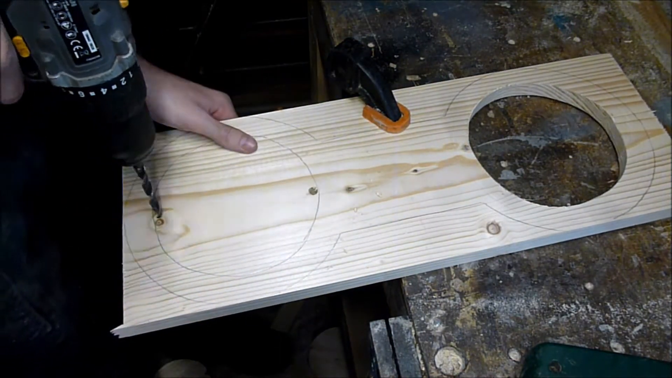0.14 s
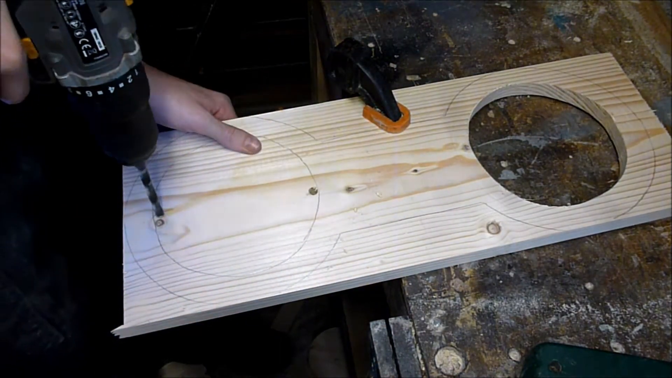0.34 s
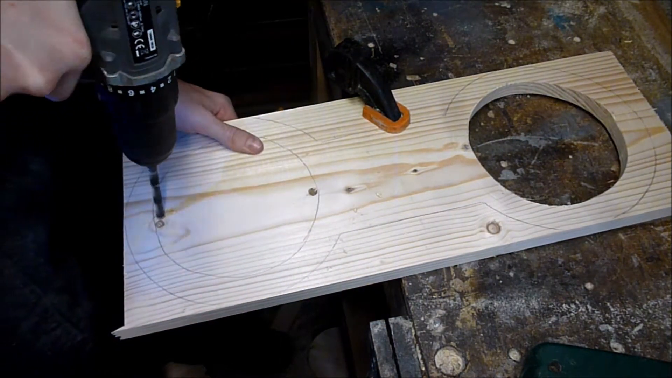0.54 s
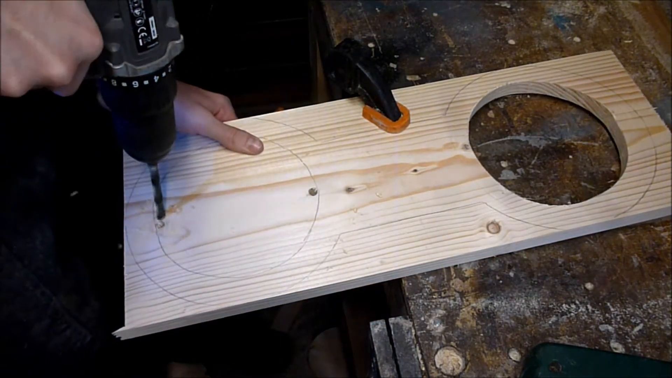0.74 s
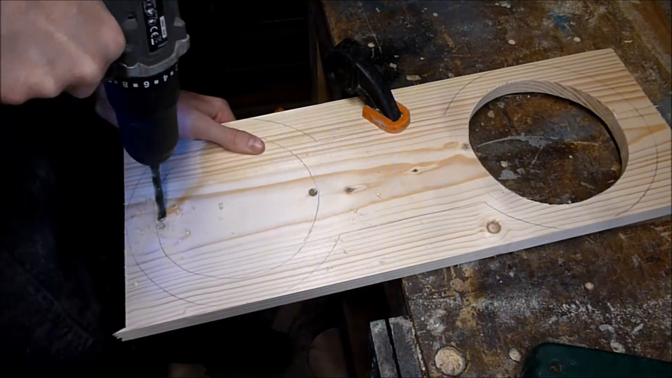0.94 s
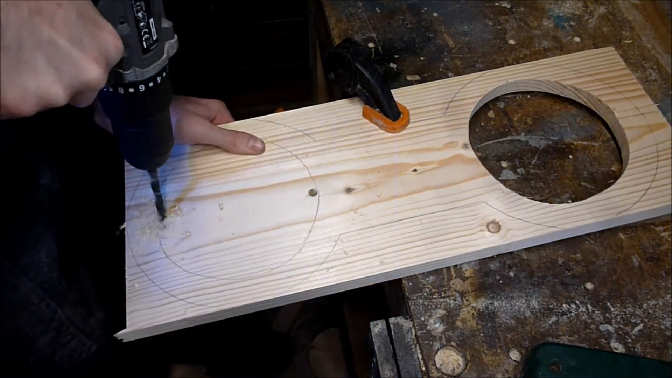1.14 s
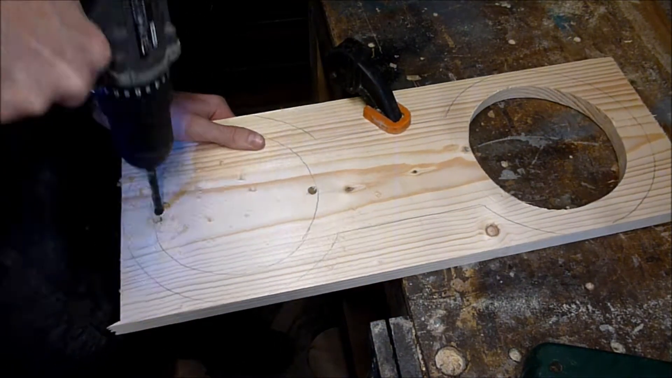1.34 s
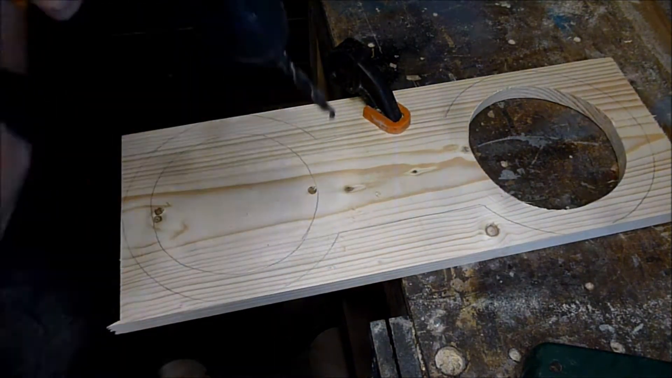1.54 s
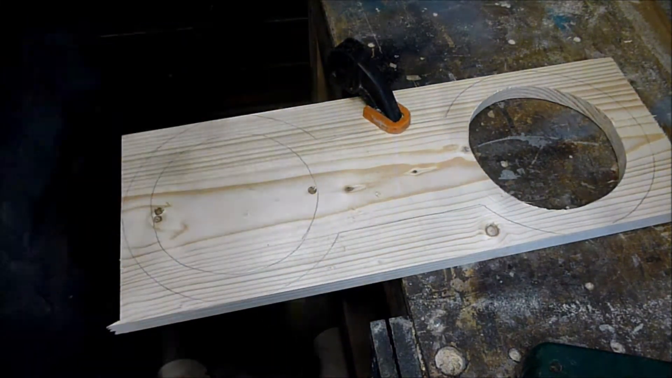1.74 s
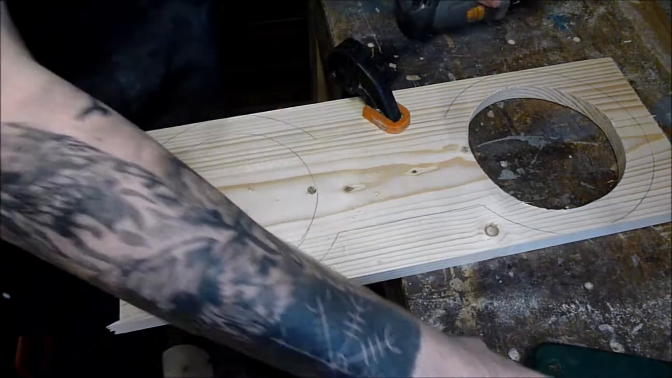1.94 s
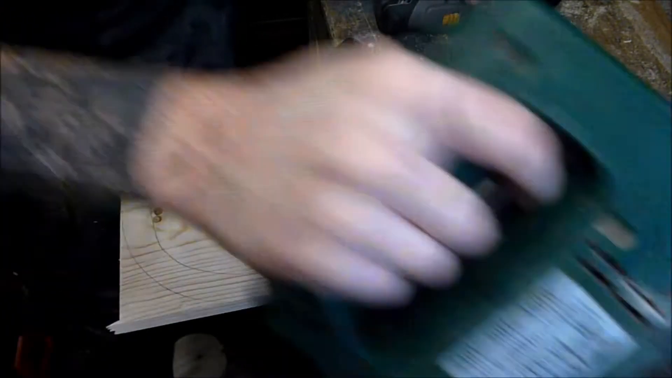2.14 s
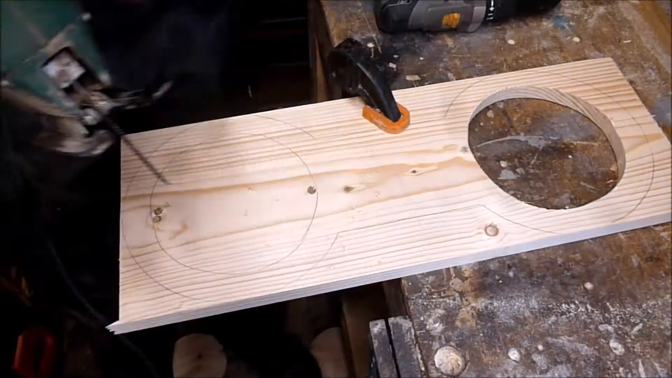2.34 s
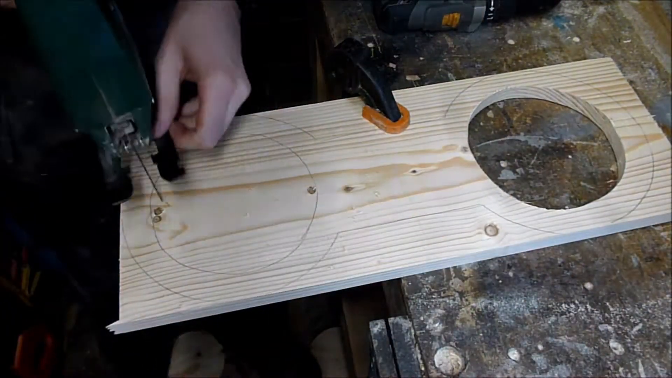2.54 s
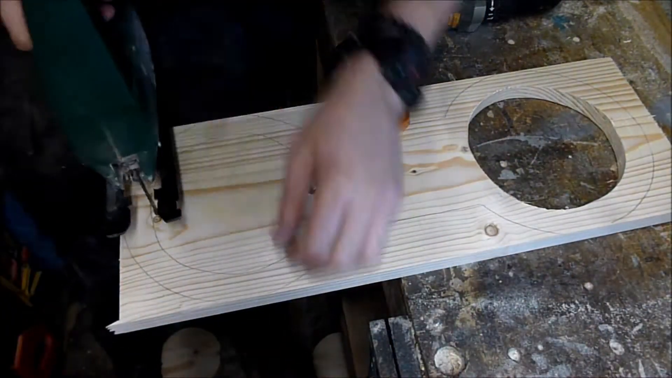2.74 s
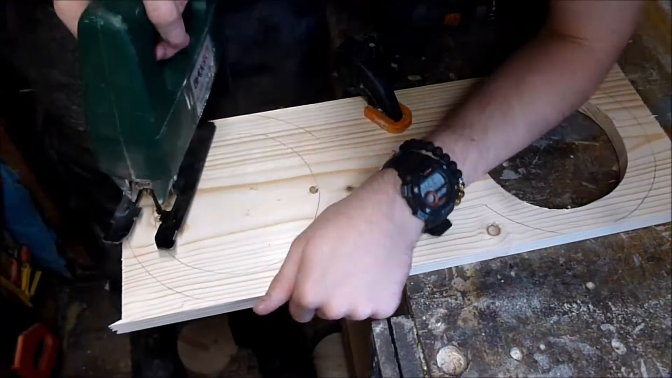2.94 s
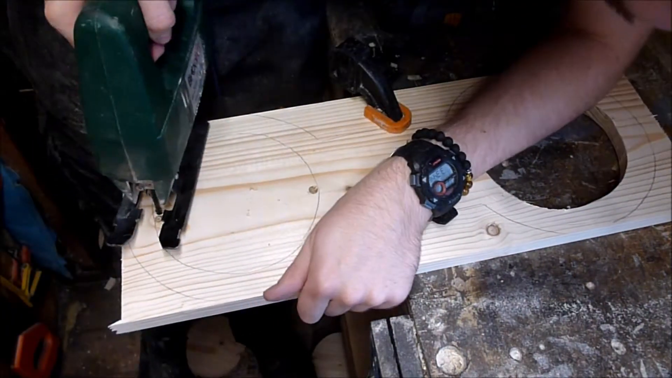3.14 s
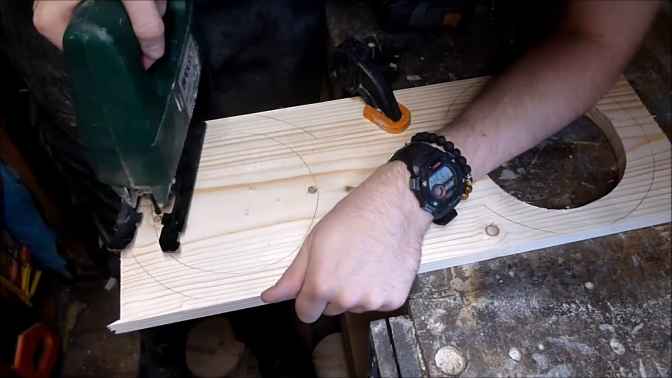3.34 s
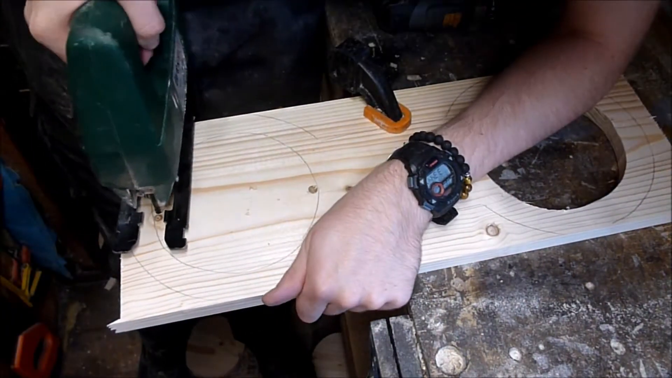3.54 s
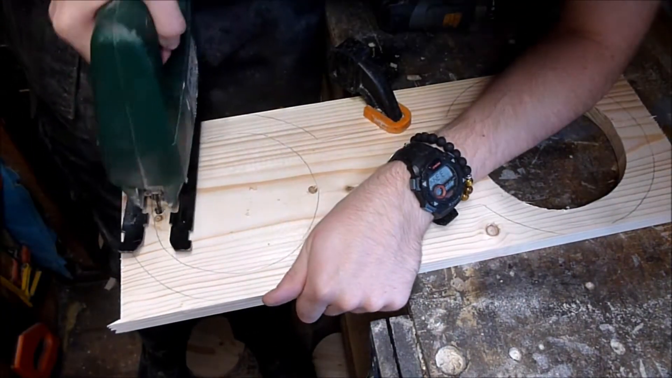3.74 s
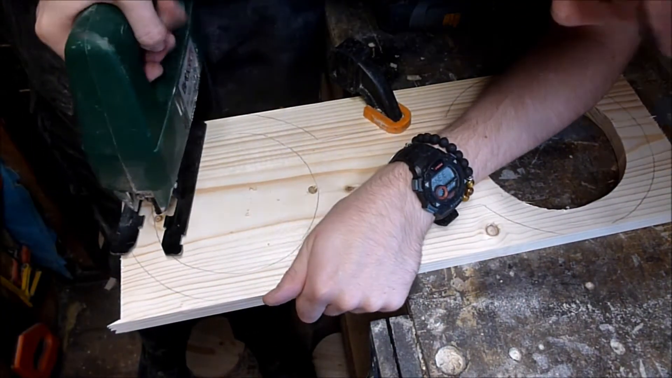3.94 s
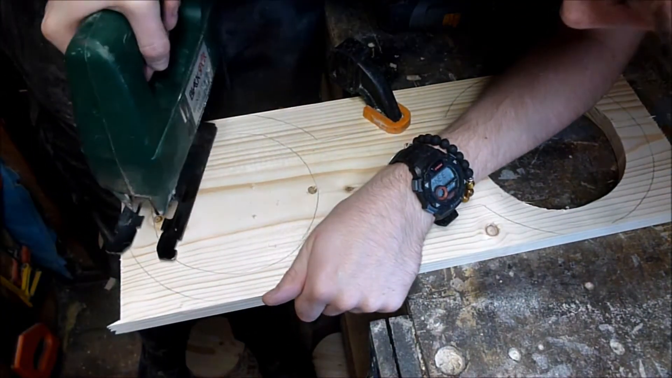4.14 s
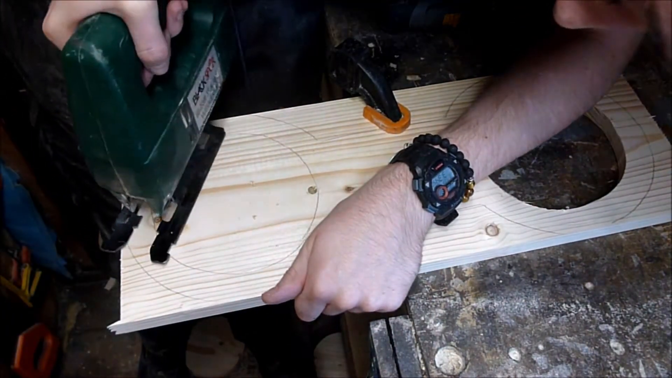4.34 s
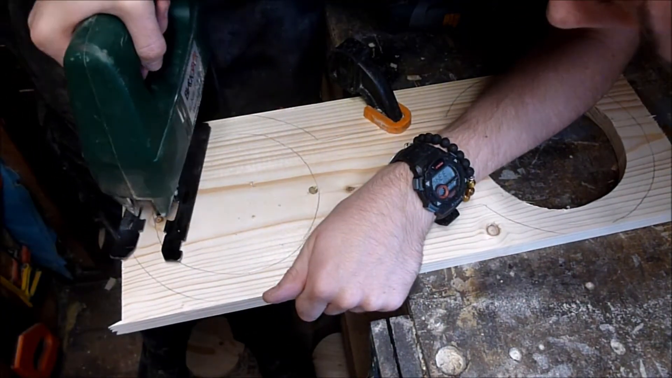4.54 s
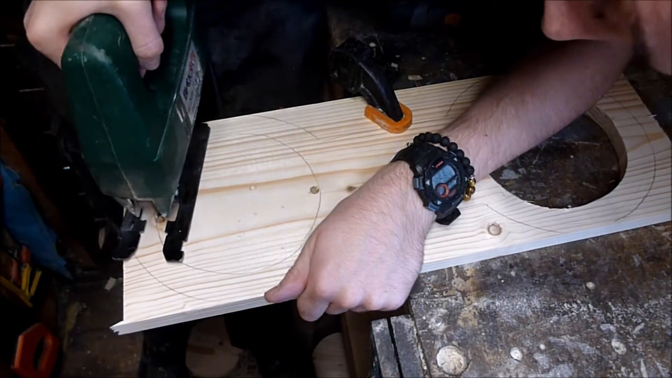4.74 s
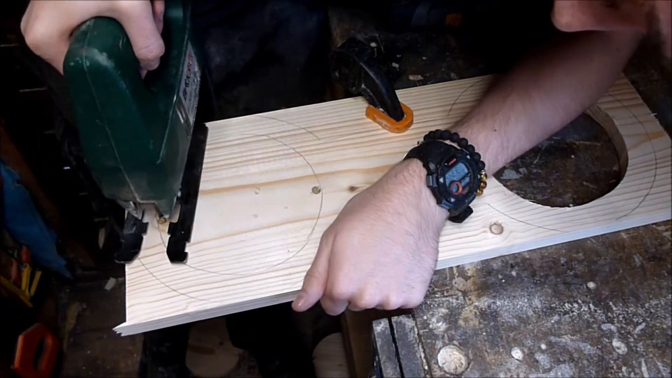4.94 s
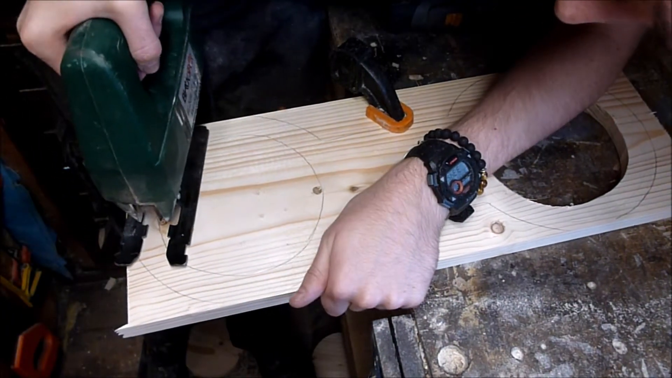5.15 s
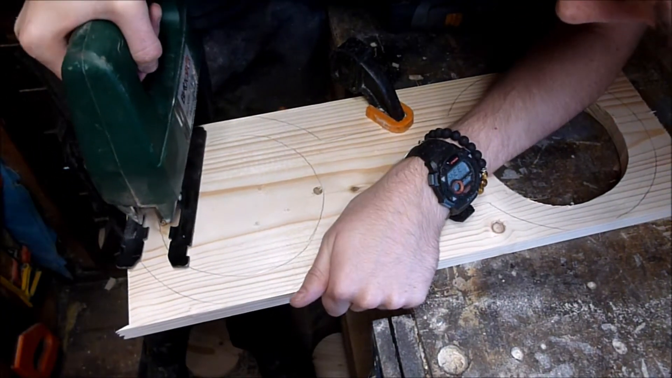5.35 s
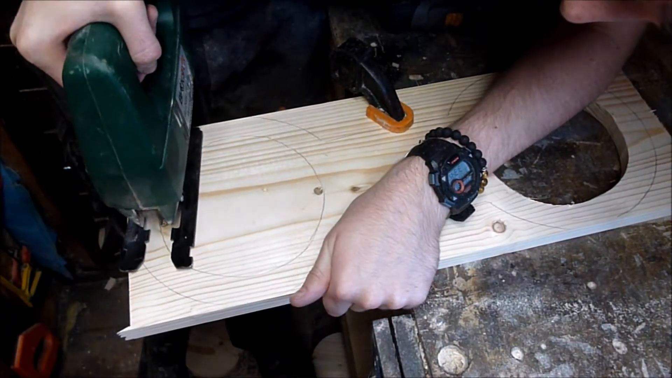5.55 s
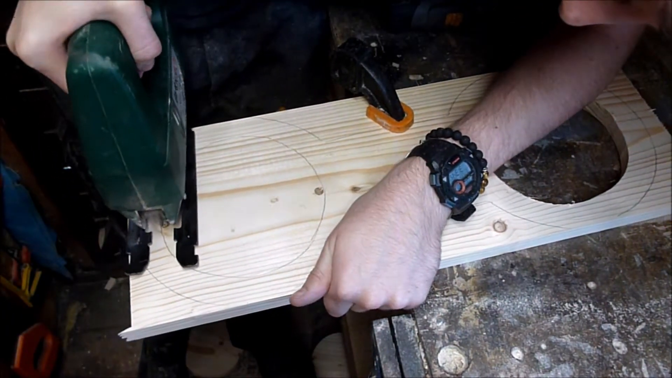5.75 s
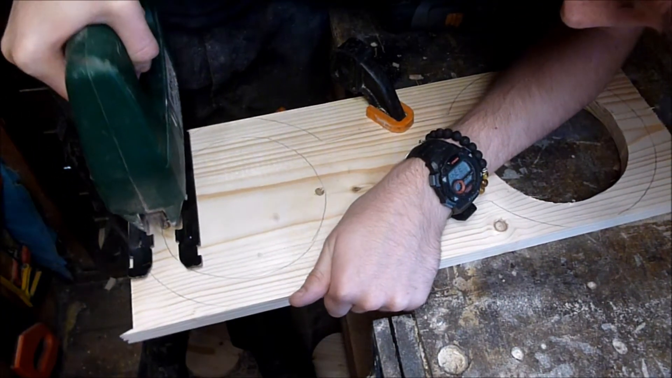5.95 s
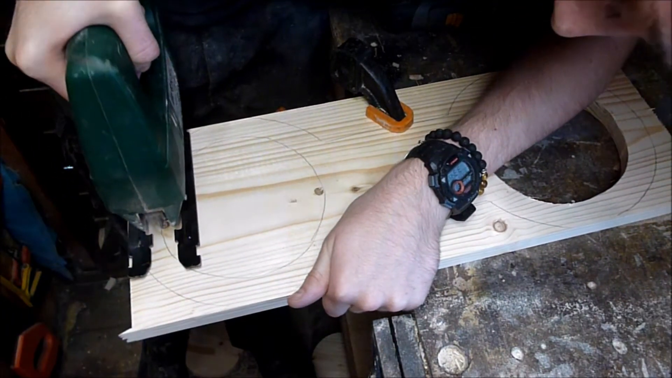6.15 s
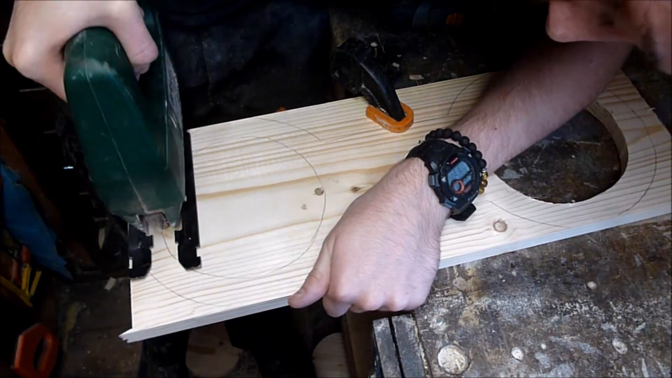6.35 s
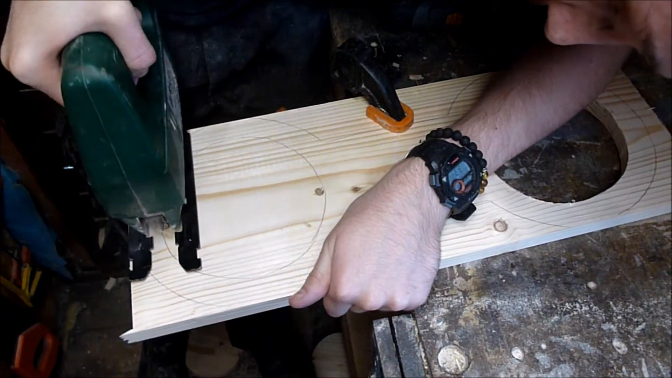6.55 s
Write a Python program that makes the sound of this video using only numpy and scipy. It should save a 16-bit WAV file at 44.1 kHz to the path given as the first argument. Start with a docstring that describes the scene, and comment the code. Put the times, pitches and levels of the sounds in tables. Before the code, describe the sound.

A cordless drill blips, then runs for about a second, hissing and rattling until the bit breaks through a board. Wooden clunks and short scrapes follow as tools are swapped on a workbench, then softer handling knocks. A jigsaw starts with a clack, rises in pitch and begins cutting, labouring with bursts of hammering near the end. Everything is heard from nearby in a small workshop with a faint background hush.

```python
"""A cordless drill whirs and rattles through a pine board clamped to a bench: fan and brush hiss, gear rattle
and thin whistles. Tools are put down and picked up, their knocks and scrapes ringing board and bench. Then a
jigsaw spins up and cuts, its shaft making tones, a rasp and one blade knock a turn, until the blade binds and
hammers. The bench and clamped board ring along with the motors. Under it all lies a room hush whose level sinks
while the motors run and slowly swells back."""
import sys
import numpy as np
from scipy import signal
from scipy.io import wavfile
from scipy.ndimage import uniform_filter1d

SR = 44100
rng = np.random.default_rng(int(sys.argv[2]) if len(sys.argv) > 2 else 0)


def wav_out(sig):
    """Save sig, one row per channel (or a flat mono array), as 16-bit PCM at SR to the path in sys.argv[1]."""
    wavfile.write(sys.argv[1], SR, np.round(np.clip(np.atleast_2d(sig).T, -1, 1) * 32767).astype(np.int16))


N = 290178

# Modes of the pine board and of the bench. Each row: pitch in Hz, relative level in dB, t60 in seconds.
BOARD_MODES = [(693, 1.5, 0.069), (941, -3.5, 0.1), (1245, 8, 0.038), (1426, 19, 0.013), (1578, 7, 0.023)]
BENCH_MODES = [(264, -3, 0.19), (326, 9.5, 0.046), (550, 11.5, 0.011)]
# Bright spectrum of a hard contact. Each row: frequency in Hz, relative density in dB.
CRACK_SPECTRUM = [(1060, -58), (1800, -12.5), (2520, -7.5), (3350, -9), (6710, -14.5), (16000, -28)]
# Pulls of the drill's trigger. Each row: start and length in seconds, hiss and gear rattle in dB.
TRIGGER_PULLS = [(0.106, 0.063, -33, -41.5), (0.227, 1.215, -32, -39)]
# The speed the jigsaw's shaft heads for. Each row: time in seconds, speed in Hz.
SAW_TARGET_SPEED = [(4.088, 100.3), (4.43, 118.1), (4.501, 119.2), (4.545, 132.7), (4.701, 140.2),
                    (5, 145.3), (5.15, 142.1), (5.45, 139.2), (5.67, 136), (5.78, 126.1), (5.85, 121.6),
                    (5.98, 114.9), (6.041, 116.7), (6.331, 117.7), (6.45, 121.2), (6.58, 120.8)]
BITE_S = 4.96  # the blade sinks into the wood


def gain_of(db):
    """Decibels to a factor."""
    return 10 ** (np.asarray(db) / 20)


def unit_rms(x):
    """Scales to rms 1."""
    return x / np.sqrt(np.mean(x ** 2) + 1e-20)


def curves(rows):
    """Turns breakpoints into sample times and one curve for each further column."""
    times, *columns = np.transpose(rows)
    t = np.arange(times[0], times[-1], 1 / SR)
    return [t] + [np.interp(t, times, column) for column in columns]


def add(mix, start, sound):
    """Mixes a sound in at a time in seconds."""
    part = mix[round(start * SR):][:len(sound)]
    part += sound[:len(part)]


def gate(t, start, length, edge):
    """1 from the start for a length, 0 outside, with soft edges."""
    return np.clip(np.minimum(t - start, start + length - t) / edge + .5, 0, 1)


def wander(size, per_s):
    """A random drift of rms about 1, with per_s turning points a second."""
    knots = rng.standard_normal(int(size / SR * per_s) + 2)
    return np.interp(np.arange(size) * per_s / SR, np.arange(len(knots)), knots)


def grit(size, spike_db):
    """Noise whose grains vary in strength."""
    return rng.standard_normal(size) * gain_of(spike_db * wander(size, 900))


def patchy(x, depth_db):
    """Small patches of time and pitch swell and fade at random."""
    spectra = signal.stft(x, nperseg=512, noverlap=384)[2]
    patches = uniform_filter1d(rng.standard_normal(spectra.shape), size=2, axis=0)
    patches = unit_rms(uniform_filter1d(patches, size=28, axis=1))
    return signal.istft(spectra * gain_of(depth_db * patches), nperseg=512, noverlap=384)[1][:len(x)]


def equalise(x, db_at):
    """Minimum-phase filter with the gain db_at(Hz)."""
    hz = abs(np.fft.fftfreq(8192, 1 / SR))
    log_gain = np.log(gain_of(np.maximum(db_at(hz), -100)))
    taps = np.fft.ifft(np.exp(np.conj(signal.hilbert(log_gain)))).real[:4096]
    return signal.oaconvolve(x, taps)[:len(x)]


def colour(x, spectrum):
    """Shapes x with a spectrum, at rms 1."""
    hz, db = np.transpose(spectrum)
    return unit_rms(equalise(x, lambda f: np.interp(np.log(f + 1), np.log(hz + 1), db)))


def bell_curve(hz, centre, width):
    """Power response of one resonance, 1 at its centre."""
    return 1 / (1 + (2 * (hz - centre) / width) ** 2)


def resonate(x, peaks, share=1):
    """Applies peaks and dips by a share of their dB, and trims the whole by 3 dB."""
    return equalise(x, lambda f: share * sum(db * bell_curve(f, hz, width) for hz, width, db in peaks) - 3)


def ring(force, modes, pitch=1):
    """A force excites dying modes, at peak 1; a free object radiates no deep bass."""
    t = np.arange(4000) / SR
    body = sum(gain_of(db - 60 * t / t60) * np.sin(2 * np.pi * hz * pitch * t) for hz, db, t60 in modes)
    low_cut = signal.butter(4, 190, "high", fs=SR, output="sos")
    sound = signal.sosfilt(low_cut, signal.oaconvolve(force, body))
    return sound / abs(sound).max()


def room_hush():
    """The level of air, hum and rumble sinks while the motors run and swells back slowly between them; the
    rumble lifts once the blade bites."""
    # Spectra of air and rumble. Each row: frequency in Hz, relative density in dB.
    air_spectrum = [(60, -27), (200, -20), (300, -18), (420, -15), (1400, -20), (2500, -26), (13700, -38),
                    (16000, -42)]
    rumble_spectrum = [(15, 3), (28, -2), (110, -4), (200, -42)]
    # Tones of the hum. Each row: pitch in Hz, relative level in dB.
    hum_tones = [(145, 1), (124, -4.5), (287, -5)]
    t = np.arange(N) / SR
    drill_s, drill_length = TRIGGER_PULLS[-1][:2]
    saw_s = SAW_TARGET_SPEED[0][0]
    sink_s, swell_s = .17, .36
    under_drill, under_saw = (1 - np.exp(-np.maximum(t - s, 0) / sink_s) for s in (drill_s, saw_s))
    sunk = under_drill * np.exp(-np.maximum(t - drill_s - drill_length, 0) / swell_s) + under_saw
    air = colour(rng.standard_normal(N), air_spectrum) * gain_of(-54.5 - 13.5 * sunk + 2.2 * wander(N, 30))
    hum = sum(gain_of(db + 2.8 * wander(N, 26.1)) * np.sin(2 * np.pi * hz * t + 1.2 * wander(N, 9.7))
              for hz, db in hum_tones)
    rumble = colour(rng.standard_normal(N), rumble_spectrum)
    rumble *= gain_of(-66 - 5.5 * sunk + 5 * (t > BITE_S) + 3.6 * wander(N, 25))
    return air + gain_of(-59.5 - 16.5 * sunk) * hum + rumble


def room_tail(x, wet_db=-16, t60=.19):
    """The room adds a short, diffuse tail."""
    t = np.arange(9000) / SR
    tail = rng.standard_normal(len(t)) * gain_of(-60 * t / t60) * np.minimum(t / .003, 1)
    return x + gain_of(wet_db) * signal.oaconvolve(x, tail / np.linalg.norm(tail))[:N]


def struck_tone(hz, db, t60):
    """One roughly struck tone that flutters as it dies."""
    t = np.arange(0, 2 * t60, 1 / SR)
    envelope = gain_of(db - 60 * t / t60 + 2.5 * wander(len(t), 200)) * np.minimum(t / .002, 1)
    return envelope * np.sin(2 * np.pi * hz * t)


def jolts():
    """Small metal parts clink and the jolted bench thumps."""
    # Metal clinks. Each row: start in seconds, pitch in Hz, level in dB.
    clinks = [(1.917, 4970, -24.5), (1.941, 5070, -35), (2.043, 5700, -35), (2.278, 3540, -34)]
    # Bench thumps. Each row: start in seconds, level in dB.
    thumps = [(.229, -45), (1.912, -41), (4.09, -37.5)]
    track = np.zeros(N)
    for start, hz, db in clinks:
        add(track, start, struck_tone(hz, db, t60=.03))
    for start, db in thumps:
        add(track, start, struck_tone(hz=55, db=db, t60=.091))
    return track


def scrape(length, dull_db, bright_db):
    """A sliding tool makes clumped grains: dull through board and bench, bright through the air."""
    size = round(length * SR)
    stroke = signal.windows.tukey(size, .6) * gain_of(5.8 * wander(size, 145))
    sound = gain_of(dull_db) * unit_rms(ring(stroke * grit(size, .6), BOARD_MODES + BENCH_MODES))
    add(sound, 0, gain_of(bright_db) * stroke * colour(grit(size, 5.2), CRACK_SPECTRUM))
    return sound


def knock(ring_db, crack_db, thud_db, pitch):
    """A rattling contact cracks and rings board and bench; the place struck shifts the board's pitch."""
    t = np.arange(3000) / SR
    force = rng.standard_normal(len(t)) * gain_of(-60 * t / .051) * np.minimum(t / .0015, 1)
    crack = colour(rng.standard_normal(len(t)), CRACK_SPECTRUM)
    crack *= gain_of(crack_db - 60 * t / .045) * np.minimum(t / .004, 1)
    sound = gain_of(ring_db) * ring(force, BOARD_MODES, pitch) + gain_of(thud_db) * ring(force, BENCH_MODES)
    add(sound, 0, crack)
    return sound


def drill_whistles():
    """Thin tones of the drill's shafts flutter in pitch and strength."""
    # One glide for each whistle. Each row: time in seconds, pitch in Hz, level in dB.
    glides = [
        [(.45, 7100, -46), (.6, 7510, -47), (.65, 8330, -44), (.74, 8420, -41), (.8, 8480, -48),
         (.9, 8520, -43), (1.2, 8450, -42.5), (1.29, 8170, -38)],
        [(.42, 8600, -47), (.47, 9000, -45), (.78, 9000, -40.5), (1.15, 9050, -39), (1.28, 9000, -39)],
        [(.3, 1400, -44), (.47, 1847, -44.5), (.61, 1890, -42.5), (.67, 2070, -51)],
    ]
    # A whistle and the gear tones below it. Each row: share of its pitch, relative level in dB.
    partials = [(1, 0), (1 / 2, -7), (1 / 9, -7)]
    track = np.zeros(N)
    for glide, partial_count in zip(glides, (3, 2, 1)):
        t, hz, db = curves(glide)
        size = len(t)
        phase = 2 * np.pi * np.cumsum(hz * (1 + .008 * wander(size, 30) + .008 * wander(size, 300))) / SR
        tones = sum(gain_of(partial_db + 6 * wander(size, 50)) * np.sin(share * phase)
                    for share, partial_db in partials[:partial_count])
        add(track, t[0], gain_of(db) * tones * signal.windows.tukey(size, .05))
    return track


def drill(start, length, hiss_db, rattle_db):
    """Fan and brushes hiss, gears rattle and the speed control sings briefly; a brake ends the run."""
    # Spectra of hiss and rattle. Each row: frequency in Hz, relative density in dB.
    hiss_spectrum = [(1760, -33.5), (3000, 0), (8700, 1.5), (14600, -1.5), (16000, -8)]
    rattle_spectrum = [(100, -44), (250, -15), (720, -19), (900, -6), (1500, -8.5), (2050, -6.5),
                       (2400, -9.5), (2700, -11.5), (3500, -9), (4600, -28)]
    # Resonances of the gearbox. Each row: centre and width in Hz, lift in dB.
    gearbox = [(615, 31, 13.5), (930, 60, 5), (996, 83, -5), (1185, 23, 10), (1428, 41, 11.5)]
    t = np.arange(start, start + length + .03, 1 / SR)
    # The bit breaks through: the rattle flares, then the drill runs free and quieter.
    through_s, through_width_s = 1.35, .037
    flare = np.exp(-((t - through_s) / through_width_s) ** 2)
    free = np.clip((t - through_s) / (2 * through_width_s), 0, 1)
    hiss = gain_of(hiss_db - free) * colour(patchy(grit(len(t), 1.2), depth_db=2.5), hiss_spectrum)
    gears = colour(patchy(grit(len(t), .95), depth_db=1.5), rattle_spectrum)
    rattle = gain_of(rattle_db - 18 * free + 10.5 * flare) * unit_rms(resonate(gears, gearbox))
    speed_control = gain_of(-36 - 51.6 * (t - start)) * np.sin(2 * np.pi * 11500 * t)
    brake = gain_of(-1500 * np.maximum(t - start - length, 0))
    return brake * (hiss + rattle + speed_control) * signal.windows.tukey(len(t), 400 / len(t))


def jigsaw_tones(hz, phase, bite, labour):
    """Growl, commutator and fan sound at shaft multiples; gears sing only near a housing resonance."""
    # Motor tones. Each row: level, flutter and change at the bite in dB, then dB per Hz of shaft speed.
    motor_tones = [(-71.5, 3.5, 20, 0.45), (-60, 4.5, 12, 0.02), (-60, 4, 7.5, -0.25),
                   (-52.5, 7.5, -0.5, -0.15), (-46, 6, 3.5, -0.3), (-44.5, 5, -10, -0.28)]
    # Gear tones. Each row: level, flutter and change at the bite in dB, resonance and its width in Hz.
    gear_tones = [(-42, 1.7, 1.5, 1026, 150), (-42, 3, -2, 1030, 120), (-50, 2.5, 10, 1420, 140)]
    motor_multiples, gear_multiples = (2, 3, 5, 42, 84, 100.3), (7, 9, 10)
    middle_hz, emerged_hz = 130, 100
    above_middle = np.maximum(hz, emerged_hz) - middle_hz
    voices = [(k, gain_of(db + bite_db * bite + slope * above_middle), flutter_db)
              for k, (db, flutter_db, bite_db, slope) in zip(motor_multiples, motor_tones)]
    for k, (db, flutter_db, bite_db, centre, width) in zip(gear_multiples, gear_tones):
        housing = np.sqrt(bell_curve(k * hz, centre, width))
        voices.append((k, gain_of(db + bite_db * bite - 12 * labour) * housing, flutter_db))
    tones = np.zeros(len(hz))
    for k, level, flutter_db in voices:
        flutter = gain_of(flutter_db * wander(len(hz), 40.11))
        unsteady_phase = phase + .007 * wander(len(hz), 300)
        tones += level * flutter * np.cos(k * unsteady_phase + 2 * np.pi * rng.random())
    emerging = np.minimum(hz / emerged_hz, 1) ** 2
    return np.sqrt(2) * emerging * tones


def jigsaw_rasp(phase, surge):
    """The shaft shakes the body with a stack of drifting harmonics, roughest at switch-on."""
    # Response of the body. Each row: frequency in Hz, relative gain in dB.
    body_spectrum = [(300, -21.5), (800, -13.5), (1000, 5), (4000, 2.5), (7000, 4.5), (9000, -19)]
    rasp = np.zeros(len(phase))
    for k in (4, 6, 8, *range(11, 48)):
        strength = gain_of(4.5 * wander(len(phase), 8))
        offset = 2 * np.pi * rng.random()
        jitter = (.2 + .012 * k + .7 * surge) * wander(len(phase), 50)
        rasp += strength * np.cos(k * phase + offset + jitter)
    return colour(rasp, body_spectrum)


def jigsaw():
    """Each shaft turn knocks the blade and pulses the hiss, over rasp and tones; a bound blade hammers."""
    # Spectrum of the hiss. Each row: frequency in Hz, relative density in dB.
    hiss_spectrum = [(88, -77), (150, -35.5), (759, -21.5), (1420, -5.5), (1980, -12), (2450, -10),
                     (3290, -4.5), (4080, -7), (9820, -8.5), (15000, -12.5), (16200, -15)]
    # Modes of the blade. Each row: pitch in Hz, relative level in dB, t60 in seconds.
    blade_modes = [(1223, 8, 0.025), (1432, 10.5, 0.027), (1600, 7.5, 0.031), (2308, 4.5, 0.037),
                   (2513, -1, 0.013), (3040, -7.5, 0.055), (4120, -1.5, 0.016), (7590, -15.5, 0.12)]
    # The blade binds. Each row: start and length in seconds, extra knock and extra hiss in dB.
    binds = [(5.664, 0.062, 5.5, 0), (5.781, 0.12, 10.5, 0.5), (5.922, 0.099, 12, 2.5),
             (6.104, 0.087, 5.5, 2), (6.277, 0.032, 4.5, 3.5), (6.4, .2, 4, 1.5)]
    spin_up_s, spin_lead_s, labour_s, edge_s = .065, .022, 5.67, .015
    t, target_hz = curves(SAW_TARGET_SPEED)
    size, age = len(t), t - t[0]
    hz = target_hz * (1 - np.exp(-(age + spin_lead_s) / spin_up_s))
    phase = 2 * np.pi * np.cumsum(hz * (1 + .002 * wander(size, 80))) / SR
    surge = np.exp(-age / .4)  # extra noise at switch-on
    bite = np.clip((t - BITE_S) / .12, 0, 1)
    labour = np.clip((t - labour_s) / edge_s, 0, 1)  # the motor labours: more rasp, weaker gear tones
    slack = gate(t, start=6.03, length=.034, edge=edge_s)  # the blade comes free for a moment
    hiss_db = -30.5 + 4.5 * surge - labour - 4 * slack
    knock_db = -39 + surge
    for start, length, extra_knock_db, extra_hiss_db in binds:
        bound = gate(t, start, length, edge_s)
        knock_db += extra_knock_db * bound
        hiss_db += extra_hiss_db * bound
    rasp = gain_of(-36.5 + 5.5 * surge + 3 * labour) * jigsaw_rasp(phase, surge)
    strikes = np.diff(np.floor(phase / (2 * np.pi)), prepend=0) * gain_of(1.1 * wander(size, 120))
    blade = gain_of(knock_db) * unit_rms(np.gradient(ring(strikes, blade_modes)[:size]))
    throb = patchy(grit(size, 1.2) * (1 + .15 * np.cos(phase)), depth_db=1.8)
    hiss = gain_of(hiss_db) * colour(throb, hiss_spectrum)
    return hiss + rasp + blade + jigsaw_tones(hz, phase, bite, labour)


def scene():
    """Motors, knocks and scrapes are coloured by the bench's resonances and join the jolts and hush."""
    # Tool knocks. Each row: start in seconds, board ring, crack and thud in dB, pitch factor of the ring.
    knocks = [(0.029, -37, -55, -63, 0.68), (0.11, -20.5, -24, -37.5, 0.94), (0.166, -26, -53, -62, 0.95),
              (0.229, -29.5, -22.5, -62, 0.97), (1.268, -17.5, -23, -43, 0.94), (1.438, -37, -29.5, -69, 1),
              (1.737, -29.5, -45, -59, 0.92), (1.829, -29, -70, -53, 0.49), (1.901, -31, -22, -27, 0.96),
              (1.912, -14.5, -20, -50, 1), (1.939, -16, -30, -48, 0.89), (2.006, -15.5, -30, -53, 0.97),
              (2.047, -20, -36, -45, 0.85), (2.165, -44, -38, -59, 0.96), (2.208, -38, -38.5, -63, 0.62),
              (2.276, -31.5, -32, -73, 1), (2.308, -33, -31.5, -69, 0.87), (2.526, -47, -41, -56, 0.83),
              (2.61, -58, -43, -60, 0.78), (2.632, -53, -54, -33.5, 1), (2.679, -45, -31, -34, 0.8),
              (2.729, -22, -33, -29, 1), (2.812, -52, -39, -39, 0.45), (2.893, -45, -37.5, -37, 0.96),
              (2.909, -33, -54, -45, 0.82), (2.959, -39, -40, -40, 0.79), (3.122, -55, -43, -60, 0.69),
              (3.163, -41.5, -44.5, -46, 0.93), (3.23, -40, -47, -35.5, 0.64),
              (3.299, -28.5, -29, -36, 0.87), (3.355, -37.5, -39.5, -43, 0.97),
              (3.408, -53, -42.5, -60, 0.74), (3.453, -62, -68, -30.5, 0.96), (3.537, -27, -26, -55, 0.99),
              (3.615, -36, -47, -55, 0.73), (3.638, -47, -26, -39, 0.8), (3.69, -30.5, -30.5, -46, 0.9),
              (3.746, -24.5, -25, -46, 0.89), (3.776, -37, -48, -55, 0.83), (3.866, -60, -43.5, -65, 1),
              (3.907, -55, -42, -65, 0.7), (4.087, -40, -14, -33, 0.75), (4.11, -22.5, -23, -30.5, 0.67)]
    # Tool scrapes. Each row: start and length in seconds, dull part and bright part in dB.
    scrapes = [(1.497, 0.071, -67, -55), (2.026, 0.064, -42, -41.5), (2.69, 0.072, -45, -43),
               (2.757, 0.15, -56, -55), (2.883, 0.11, -50, -47), (3.301, 0.046, -55, -45),
               (3.605, 0.056, -47.5, -40), (3.725, 0.071, -46.5, -42.5)]
    # Resonances of the bench and clamped board. Each row: centre and width in Hz, lift in dB.
    bench_resonances = [(994, 93, 8), (1466, 30, 3.5), (1970, 230, -4), (2481, 163, 16), (3310, 110, -8.5),
                        (4080, 41, 6.5), (4480, 270, -3.5), (5070, 68, 4.5)]
    swap_s = 2.35  # from here the jigsaw is in hand
    motors, drill_handling, saw_handling = np.zeros((3, N))
    add(motors, SAW_TARGET_SPEED[0][0], jigsaw())
    for start, *pull in TRIGGER_PULLS:
        add(motors, start, drill(start, *pull))
    motors += drill_whistles()
    for contact, rows in ((knock, knocks), (scrape, scrapes)):
        for start, *settings in rows:
            add(drill_handling if start < swap_s else saw_handling, start, contact(*settings))
    # The bench and clamped board ring along with the motors, and less with knocks and scrapes.
    handling = resonate(drill_handling, bench_resonances, share=.26)
    handling += resonate(saw_handling, bench_resonances, share=.83)
    mix = resonate(motors, bench_resonances) + room_tail(handling + jolts()) + room_hush()
    return np.array([mix, mix])


def record(dry, edge_hz=16050, dc_offset=.0046):
    """Cuts the highest treble and adds a constant offset, in mono."""
    low_pass = signal.firwin(511, edge_hz, window=("kaiser", 9), fs=SR)
    heard = signal.oaconvolve(dry[0], low_pass, "same") + dc_offset
    return np.array([heard, heard])


dry = scene()
out = record(dry)
wav_out(out)
```